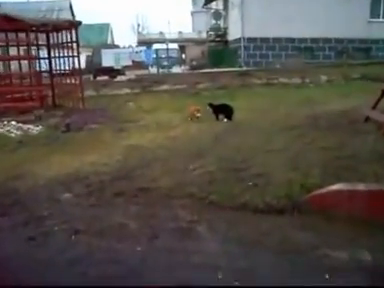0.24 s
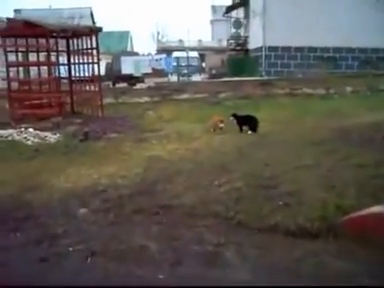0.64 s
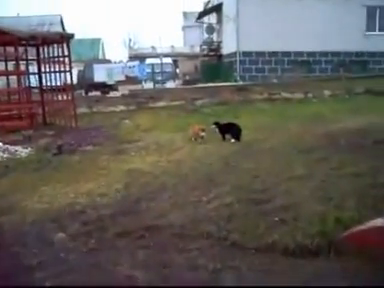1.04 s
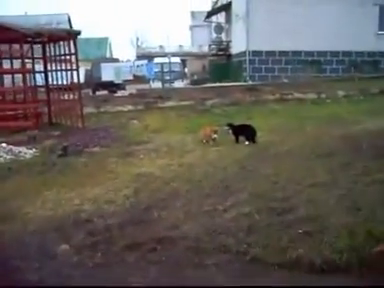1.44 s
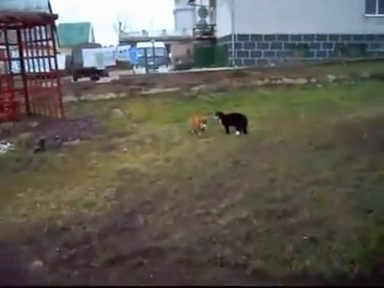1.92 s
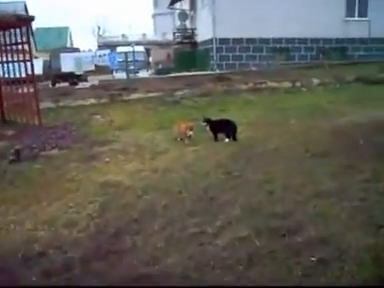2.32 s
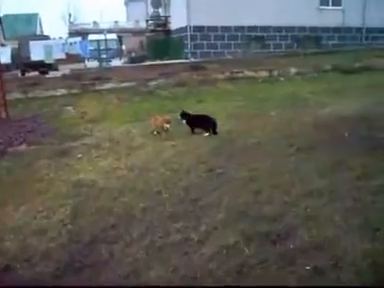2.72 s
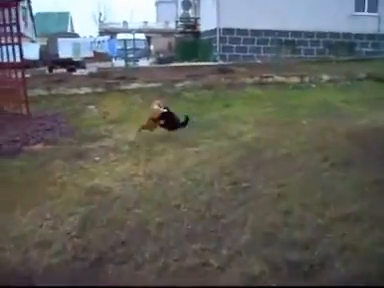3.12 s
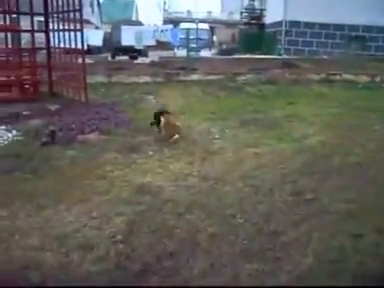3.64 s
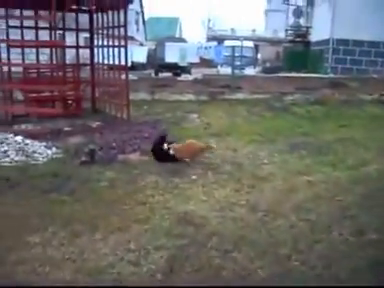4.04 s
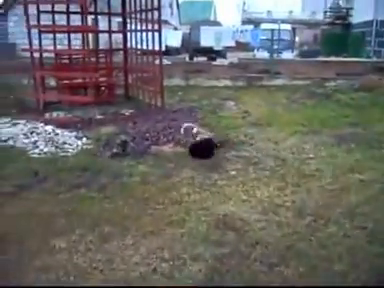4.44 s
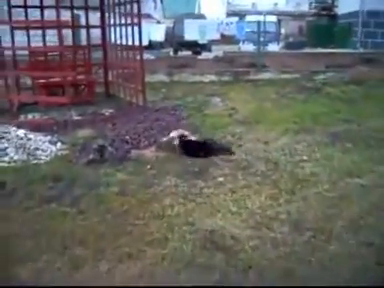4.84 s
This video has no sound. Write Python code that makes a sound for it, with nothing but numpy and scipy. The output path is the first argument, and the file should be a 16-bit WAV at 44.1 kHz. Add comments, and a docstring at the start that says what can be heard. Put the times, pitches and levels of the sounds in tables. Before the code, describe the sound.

A cat's long wavering yowl and another's low moan climb into a rasping shriek and screeching clash, then snarls, thin whines and muffled growls outdoors.

```python
"""On a lawn between house walls two cats face off: one holds a long yowl, the other answers with a low moan.
A rising shriek breaks into a screech as they clash, then come snarls, a thin whine and muffled growls.
Calls are sums of harmonics shaped by the mouth; harsh voices mix irregular fold pulses with puffs of noise.
Paws thud as resonant noise and dry grass snaps as short noise bursts; wall echoes, a scattered tail and
a faint outdoor hush of coloured noise surround them."""
import sys
import numpy as np
from scipy import signal
from scipy.fft import rfft, irfft, next_fast_len
from scipy.io import wavfile
from scipy.ndimage import uniform_filter1d

SR = 44100
rng = np.random.default_rng(int(sys.argv[2]) if len(sys.argv) > 2 else 0)


def materialize(psi):
    """Save the field psi as 16-bit PCM at rate SR to the path in sys.argv[1].

    A 1-D psi becomes a single channel; in a 2-D psi each row is a channel.
    """
    bounded = np.clip(np.atleast_2d(psi).T, -1, 1)
    quanta = np.round(bounded * 32767).astype(np.int16)
    wavfile.write(sys.argv[1], SR, quanta)


N = 224086
TIME = np.arange(N) / SR

# Pitch of the long yowl. Each row: time in seconds, pitch in Hz.
YOWL_PITCH = [(0.0, 469.7), (0.06, 463.1), (0.37, 488.8), (0.41, 507.3), (0.92, 457.8), (0.99, 472.3),
              (1.08, 528), (1.1, 603), (1.16, 691), (1.23, 726), (1.32, 698.7), (1.49, 524.6),
              (1.54, 498.5), (1.7, 514.6), (1.76, 496), (1.93, 496.4), (2.03, 454), (2.11, 377)]
# Partings of the lips in the yowl. Each row: parting in seconds, start of closing in seconds,
# closing time in seconds.
LIP_PARTINGS = [(0.202, 0.582, 0.21), (0.868, 2.013, 0.11)]
# Lowest mouth resonance, which follows the jaw. Each row: time in seconds, resonance in Hz.
JAW_RESONANCE = [(.2, 1770), (.48, 2050), (.6, 1510), (.97, 1440), (1.22, 2200), (1.44, 2244), (1.65, 1910)]
# Mouth colours of the yowl, narrow and wide. Each row: frequency in Hz, relative level in dB.
MOUTH_NARROW = [(480, -18.5), (960, -14.5), (1150, -18), (1450, -9), (2000, -9.5), (2450, 0.5),
                (2950, -1.5), (3400, -19), (3900, -22.5), (4400, -24.5), (5000, -19.5), (5500, -14),
                (6100, -25), (7200, -26), (9500, -44.5)]
MOUTH_WIDE = [(700, -14), (1350, -30.5), (1800, -17.5), (2200, -9), (2850, -12), (3550, -5.5), (4300, 0.5),
              (5000, -12), (5700, -9), (6400, -17), (7200, -12.5), (8500, -22), (10000, -51)]
# Air hissing through the parted lips. Each row: frequency in Hz, relative level in dB.
LIP_HISS = [(800, -18.5), (2400, -13), (4000, 9), (5500, 7.5), (7500, 9.5), (10000, -35.5)]
PART_S, LIPS_SHUT_DB = 0.061, -12.5
# Loudness and shrillness follow the pitch, trailing it a little; the levels apply at REST_HZ.
REST_HZ, JAW_LAG_S = 492.2, 0.022
THROAT_DB, THROAT_DB_PER_OCT, THROAT_MAX_DB = -31, 30, -22
SHRILL_DB, SHRILL_DB_PER_OCT = -48.5, 43.5

# Snapping grass. Each row: time in seconds, relative level in dB.
GRASS_SNAPS = [(0.204, -25.5), (0.5413, -30), (3.798, -40), (3.987, -43.5), (4.45, -34), (4.464, -36.5),
               (4.486, -43), (4.5665, -47), (4.9188, -23), (4.925, -17)]
# Dull paw thuds. Each row: time in seconds, relative level in dB, resonance in Hz.
PAW_THUDS = [(1.111, -40.5, 201), (1.893, -36, 219.3), (3.026, -31, 75), (3.986, -35, 284)]
# Colour of the grass blades. Each row: frequency in Hz, relative level in dB.
GRASS_COLOUR = [(100, -44), (300, -19), (2200, -18), (3500, -2.0), (4700, -3.0), (7000, -7),
                (9000, -27.0), (11000, -69.5)]
# Colour of the outdoor hush. Each row: frequency in Hz, relative level in dB.
HUSH_COLOUR = [(12, -29.5), (20, 0.5), (401, -13.5), (446, -10), (538, -8.5), (895, -7.5), (1200, -13.5),
               (2280, -16), (2980, -22), (8030, -25), (10200, -54), (12000, -84), (15600, -104),
               (22000, -120)]
HUSH_DB = -51.5

# Snarls and growls. Each row: start, widest mouth and end in seconds, open-mouth pitch in Hz,
# open-mouth resonance in Hz, its strength in dB, open-mouth chest, throat and edge
# (low, middle and high register) levels in dB, roughness from 0 to 1.
SNARLS = [(2.005, 2.06, 2.14, 390, 850, 12, -46.5, -54, -72, 0.4),
          (3.076, 3.139, 3.175, 462, 2100, -12, -38, -16.5, -26, .8),
          (3.164, 3.197, 3.27, 489.2, 1990, -2.5, -42.5, -11, -23, 0.65),
          (3.27, 3.339, 3.375, 412.2, 1490, 4.5, -37.5, -26, -41, 0.68),
          (3.381, 3.535, 3.595, 289.9, 2140, 12.5, -31.5, -29, -47.5, 0.77),
          (3.595, 3.696, 3.75, 240.1, 1390, 16, -34.5, -36.5, -65, 0.38),
          (4.855, 4.88, 4.91, 236.5, 700, -4, -40, -60, -77, 0.65),
          (4.916, 4.96, 5.07, 237.7, 790, -8, -30, -43.5, -60, 0.8),
          (5.009, 5.081, 5.1, 301.8, 1900, -6, -37.5, -34, -46, 0.69)]
# Colour of the snarls. Each row: frequency in Hz, relative level in dB.
SNARL_COLOUR = [(70, -46), (170, 1), (230, -6.5), (450, 10.5), (700, 0.5), (900, 6), (1300, 8.5),
                (2300, 10), (3000, 1), (4000, -2.5), (5200, 5), (6800, -2.5), (8500, -10.5), (11000, -64)]
SNARL_ATTACK_S, SNARL_RELEASE_S = 0.0065, 0.044
# As the mouth shuts its resonance moves to SHUT_HZ, the pitch sags and the upper registers dim.
SHUT_HZ, SHUT_PITCH_SAG, SHUT_THROAT_DB, SHUT_EDGE_DB = 965, .12, -11, -12.5

# The soft moan. Each row: time in seconds, pitch in Hz, relative level in dB.
MOAN_COURSE = [(2.09, 369, -39), (2.136, 326.5, -49.5), (2.25, 427.6, -35.5), (2.34, 478.6, -40),
               (2.404, 426.4, -44.5), (2.47, 403, -47.5), (2.56, 440, -42)]
# Closed-mouth colour of the moan. Each row: frequency in Hz, relative level in dB.
MOUTH_SHUT = [(400, -13), (750, 0), (1000, 0), (1250, -5), (1450, -20), (1750, -22), (2200, -9),
              (2600, -13), (3300, -40)]

# The shriek. Each row: time in seconds, rate of the doubled fold period in Hz.
SHRIEK_RATE = [(2.49, 204.6), (2.534, 277.1), (2.598, 320.8), (2.68, 364.2), (2.733, 426.7), (2.739, 458.8),
               (2.8, 491), (2.895, 532.2), (2.965, 608.6), (3.01, 630)]
# Its strength. Each row: time in seconds, relative throat level in dB, relative edge level in dB.
SHRIEK_LEVEL = [(2.49, -45, -62), (2.52, -29.5, -41), (2.552, -26.5, -28), (2.616, -25, -17),
                (2.776, -14, -12.5), (2.83, -11.5, -16), (2.944, -19, -10.5), (3.01, -15, -19)]
# Mouth colour of the shriek. Each row: frequency in Hz, relative level in dB.
MOUTH_SHRIEK = [(550, -24), (1000, -30), (1500, -30), (1950, -14), (2450, 0), (2950, -19), (3400, -25),
                (4000, -6), (4750, 0), (5400, -13), (5900, -28), (6700, -16), (7700, -30), (9500, -44)]
DOUBLING_S, DOUBLING_TAKES_S = 2.615, 0.02  # the folds slip into period doubling

# Colour of the harsh open-mouthed clash. Each row: frequency in Hz, relative level in dB.
SCREAM_COLOUR = [(180, -51), (300, -13), (427, -23.5), (629, -19), (750, -5.5), (1120, -28), (1250, -12),
                 (1430, -15.5), (2310, -7.5), (2850, -10), (4260, -15), (5330, -16.5), (7240, -16.5),
                 (10300, -42), (14000, -80)]
SCREAM_START_S, SCREAM_PEAK_S, SCREAM_END_S = 2.78, 3.007, 3.135
# Shrill tones in the clash and in the last cry. Each row: start in seconds, length in seconds,
# first pitch in Hz, last pitch in Hz, relative level in dB.
SCREECHES = [(2.964, 0.092, 2079, 2315, -14.5), (3.008, 0.047, 4150, 4400, -15.5),
             (3.04, 0.0365, 2487, 2174, -8.5), (3.048, 0.042, 4030, 3860, -15.5),
             (5.029, 0.036, 4600, 4670, -45)]

# Air around the whines. Each row: frequency in Hz, relative level in dB.
WHINE_AIR_COLOUR = [(400, 2), (900, 9.5), (1300, -2), (1900, -5), (2350, 4), (2900, -25), (5000, -47)]
# Thin whines. Each row: start in seconds, length in seconds, mid-call pitch in Hz, relative level in dB.
WHINES = [(3.89, .63, 779.5, -43), (4.57, .36, 773, -44.5)]
# Colour of the whine through the nose. Each row: frequency in Hz, relative level in dB.
NOSE = [(780, 8), (1550, -15), (2300, -10.5), (3200, -20)]
WHINE_SAG_HZ_PER_S = 110
# Muffled grunts. Each row: centre in seconds, relative level in dB, length in seconds.
GRUNTS = [(4.405, -42.5, 0.14), (4.46, -48, 0.051), (4.503, -38.5, 0.055), (4.59, -39.5, .075),
          (4.648, -50, 0.044)]

# Decay of the scattered tail. Each row: frequency in Hz, time to fall 60 dB in seconds.
YARD_DECAY = [(200, 0.38), (2000, 0.063), (5000, 0.34), (9000, 0.054)]
# Wall echoes. Each row: delay in seconds, level in dB.
WALL_ECHOES = [(0.015, -16.5), (0.044, -18.5)]
# Broad noise whose strength follows the loudness. Each row: frequency in Hz, relative level in dB.
NOISE_COLOUR = [(25, 5), (80, 6.5), (180, 6.5), (400, 6), (2500, 2.5), (5000, -23), (8000, 1),
                (10000, -27.5), (14000, -45.5)]
EDGE_HZ = 14400  # upper band limit


def amp(db):
    """Level law: decibels become an amplitude ratio."""
    return 10 ** (np.asarray(db) / 20)


def unit(x):
    """Power normalisation: scales a signal to rms 1."""
    return x / np.sqrt(np.mean(x ** 2) + 1e-20)


def read(points, hz):
    """Spectral interpolation: reads a spectrum on a log-frequency axis."""
    f, value = np.transpose(points)
    return np.interp(np.log(hz + 1), np.log(f + 1), value)


def play(rows):
    """Linear interpolation: sample times of a curve table, and each column at those times."""
    s, *columns = np.transpose(rows)
    t = np.arange(s[0], s[-1], 1 / SR)
    return [t] + [np.interp(t, s, column) for column in columns]


def add(mix, s, sound):
    """Superposition: sums a sound into the mix at time s."""
    part = mix[max(round(s * SR), 0):][:len(sound)]
    part += sound[:len(part)]


def fade(t):
    """Amplitude envelope: an 11 ms linear start and end of a call."""
    return np.clip(np.minimum(t - t[0], t[-1] - t) / .011, 0, 1)


def gate(t, start, end, attack, release):
    """Amplitude envelope: attack, hold and release, from 0 to 1 and back."""
    return np.clip(np.minimum((t - start) / attack, (end - t) / release), 0, 1)


def colour(x, points):
    """Linear filtering: multiplies the Fourier spectrum by a colour, then scales to rms 1."""
    size = next_fast_len(len(x) + 512)
    gain = amp(read(points, np.fft.rfftfreq(size, 1 / SR)))
    return unit(irfft(rfft(x, size) * gain, size)[:len(x)])


def wobble(t, hz):
    """Band-limited random modulation: low-passed noise of rms 1, up to about hz."""
    f = np.fft.rfftfreq(65536, 1 / SR)
    slow = irfft(rfft(rng.standard_normal(65536)) / (1 + (f / hz) ** 4))
    return unit(np.resize(slow, len(t)))


def resonate(x, hz, width):
    """Resonance: a gain-1 peak follows hz by shifting it to zero frequency for a one-pole low-pass."""
    turn = np.exp(2j * np.pi * np.cumsum(hz * np.ones(len(x))) / SR)
    r = np.exp(-np.pi * width / SR)
    return 2 * (turn * signal.lfilter([1 - r], [1, -r], x / turn + 1e-18)).real


def registers(x, splits, levels):
    """Band splitting: each register, low to high, is levelled by its running power and set in dB."""
    size = next_fast_len(len(x) + 2048)
    f, rest, out = np.fft.rfftfreq(size, 1 / SR), rfft(x, size), 0
    for hz, db in zip(list(splits) + [SR], levels):
        low = rest / (1 + (f / hz) ** 20)
        rest = rest - low
        part = irfft(low, size)[:len(x)]
        power = uniform_filter1d(uniform_filter1d(part ** 2, size=900), size=900)
        out = out + amp(db) * part / np.sqrt(abs(power) + 1e-12)
    return out


def folds(t, hz, shape, jitter, flutter, count=26):
    """Harmonic series of vibrating folds: pitch jitters, partials flutter, shape(f) gives their dB."""
    phase = 2 * np.pi * np.cumsum(hz * (1 + jitter * wobble(t, 230))) / SR
    lag = rng.uniform(0, np.pi, count + 1)  # random phase per partial softens each pulse
    voice = 0
    for k in range(1, count + 1):
        level = amp(shape(k * hz)) * (k * hz < 9800)
        voice = voice + level * (1 + flutter * wobble(t, 32)) * np.cos(k * phase + lag[k])
    return voice


def rasp(t, hz, jitter, rough):
    """Irregular vibration: fold pulses with fluctuating partials, and a puff of noise in each cycle."""
    turns = np.cumsum(hz * (1 + jitter * wobble(t, 123.3))) / SR
    pulses = sum((1 + .5 * wobble(t, 71)) * np.cos(2 * np.pi * k * turns) for k in range(1, 17))
    puffs = (0.079 + np.exp(-(turns % 1) / .5)) * rng.standard_normal(len(t))
    rough = np.clip(rough, 0, 1)
    return ((1 - rough) * unit(pulses) + rough * unit(puffs)) * (1 + 0.13 * wobble(t, 57))


def yowl(jitter=0.0047, breath_db=-21, chest_db=-46, jaw_db=10, jaw_width_hz=220, muffle_db=-18,
         hiss_db=-6, quaver=.0065, dip_db=-7, dip_hz=4000):
    """Source and filter: a breathy voice whose mouth opens wider and quavers as the pitch climbs."""
    t, hz = play(YOWL_PITCH)
    trailing_hz = np.interp(t - JAW_LAG_S, t, hz)
    opening = np.clip((trailing_hz - REST_HZ) / 150, 0, 1)
    jaw_hz = np.interp(t, *np.transpose(JAW_RESONANCE))
    shut = 1 - sum(gate(t, start, end + closing, PART_S, closing) for start, end, closing in LIP_PARTINGS)

    octaves = np.log2(trailing_hz / REST_HZ)
    throat = np.minimum(THROAT_DB + THROAT_DB_PER_OCT * octaves, THROAT_MAX_DB) + LIPS_SHUT_DB * shut
    edge = SHRILL_DB + SHRILL_DB_PER_OCT * octaves

    def shape(f):
        """Vocal-tract filter in dB: narrow to wide, with the jaw resonance and the muffling of the lips."""
        narrow = read(MOUTH_NARROW, f) + dip_db * np.exp(-((f - dip_hz) / 500) ** 2)
        mouth = (1 - opening) * narrow + opening * read(MOUTH_WIDE, f)
        lips = muffle_db * shut * np.exp(-((f - 3000) / 400) ** 2)
        return mouth + lips + jaw_db / (1 + ((f - jaw_hz) / jaw_width_hz) ** 2)

    quavering_hz = hz * (1 + quaver * opening * wobble(t, 25))
    source = folds(t, quavering_hz, shape, jitter * (1 + opening), flutter=.17)
    voice = registers(source, (1150, 3400), (chest_db, throat, edge))
    breath = amp(throat + breath_db) * opening * colour(rng.standard_normal(len(t)), MOUTH_WIDE)
    hiss = amp(SHRILL_DB + hiss_db) * (1 - shut) * colour(rng.standard_normal(len(t)), LIP_HISS)
    return t[0], (voice + breath + hiss) * fade(t)


def grass_snaps(snap_db=-2):
    """Impulsive fracture: each snap is a noise burst with a fast and a weak slow decay."""
    snaps, t = np.zeros(N), np.arange(3000) / SR
    for s, db in GRASS_SNAPS:
        decay = np.exp(-t / .0011) + .07 * np.exp(-t / .014)
        add(snaps, s, amp(db + snap_db) * rng.standard_normal(len(t)) * decay)
    return snaps.std() * colour(snaps, GRASS_COLOUR)


def grass_rustle(rustle_db=-60, per_s=90):
    """Poisson-like crackle: random clicks decay as noise; the rustle gains strength after 3.2 s."""
    strengths = amp(4.5 * np.minimum(rng.exponential(1, N), 3))
    clicks = (rng.random(N) < per_s / SR) * strengths
    decay = signal.lfilter([1], [1, -np.exp(-1 / (0.0063 * SR))], clicks)
    crackle = decay * rng.standard_normal(N)
    return amp(rustle_db) * colour(crackle, GRASS_COLOUR) * np.interp(TIME, [3.2, 3.5], [.3, 1])


def paw_thuds():
    """Damped resonance: noise through two equal resonances rises and dies within milliseconds."""
    thuds, t = np.zeros(N), np.arange(3000) / SR
    for s, db, hz in PAW_THUDS:
        body = unit(resonate(resonate(rng.standard_normal(len(t)), hz, 300), hz, 300))
        add(thuds, s, amp(db) * body * t / 0.0049 * np.exp(1 - t / 0.004))
    return thuds


def outdoor_hush():
    """Stationary noise: a faint steady background with a falling spectrum."""
    return amp(HUSH_DB) * colour(rng.standard_normal(N), HUSH_COLOUR)


def snarl(start, widest, end, pitch_hz, open_hz, mouth_db, chest_db, throat_db, edge_db, rough,
          jitter=0.055, width_hz=600, shut_chest_db=-4):
    """Moving resonance: a rough voice in a mouth that opens and shuts once, dying behind shut lips."""
    t, shut = play([(start, 1), (widest, 0), (end, 1), (end + SNARL_RELEASE_S, 1)])
    drive = rasp(t, pitch_hz * (1 - SHUT_PITCH_SAG * shut), jitter * rough, rough)
    mouth_hz = open_hz * (SHUT_HZ / open_hz) ** shut
    ringing = resonate(resonate(drive, mouth_hz, width_hz), mouth_hz, width_hz)
    voice = colour(drive + amp(mouth_db) * ringing, SNARL_COLOUR)
    chest = chest_db + shut_chest_db * shut
    throat = throat_db + SHUT_THROAT_DB * shut
    edge = edge_db + SHUT_EDGE_DB * shut
    envelope = gate(t, start, t[-1], SNARL_ATTACK_S, SNARL_RELEASE_S)
    return start, registers(voice, (850, 3400), (chest, throat, edge)) * envelope


def moan(jitter=0.0068, gain_db=-1, shut_db=-18, open_db=6):
    """Changing filter: the low moan's overtones come out as the mouth starts to open."""
    t, hz, db = play(MOAN_COURSE)
    bright_db = np.interp(t, [2.3, 2.45], [shut_db, open_db])

    def shape(f):
        """Vocal-tract filter in dB: the shut mouth, with brightness varied above 1 kHz."""
        return read(MOUTH_SHUT, f) + bright_db * np.clip((f - 1000) / 200, 0, 1)

    return t[0], amp(db + gain_db) * unit(folds(t, hz, shape, jitter, flutter=0.2, count=7)) * fade(t)


def shriek(jitter=0.0048, chest_db=-26, single_db=-26, doubled_db=2, throat_db=-.5, edge_db=-1):
    """Period doubling: odd partials emerge as the cry roughens and drawn-back lips raise resonances."""
    t, hz = play(SHRIEK_RATE)
    s, *levels = np.transpose(SHRIEK_LEVEL)
    throat, edge = (np.interp(t, s, db) for db in levels)
    strain = np.interp(t, [2.81, 2.86, 3.0], [1, 2.1, 2.8])
    spread = np.interp(t, [2.5, 2.7, 2.9, 2.97], [.93, 1, 1, 1.08])
    odd_db = np.interp(t - DOUBLING_S, [0, DOUBLING_TAKES_S], [single_db, doubled_db])

    def shape(f):
        """Vocal-tract filter in dB: shifted mouth resonances, with the odd partials set apart."""
        return read(MOUTH_SHRIEK, f / spread) + odd_db * (np.round(f / hz) % 2)

    voice = folds(t, hz, shape, jitter * strain, flutter=.3, count=32)
    levels = throat + chest_db, throat + throat_db, edge + edge_db
    return t[0], registers(voice, (1150, 3400), levels) * fade(t)


def scream(throat_db=-18.0, edge_db=-15, rise_db_per_s=50, throat_fall_db_per_s=55, edge_fall_db_per_s=140):
    """Chaotic folds as the cats collide: a swell, then a fall in which the edge dies first."""
    t = np.arange(SCREAM_START_S, SCREAM_END_S, 1 / SR)
    swell = rise_db_per_s * np.minimum(t - SCREAM_PEAK_S, 0)
    past = np.maximum(t - SCREAM_PEAK_S, 0)
    throat = throat_db + swell - throat_fall_db_per_s * past
    edge = edge_db + swell - edge_fall_db_per_s * past
    pitch_hz = np.interp(t, [2.82, 2.98, 3.13], [520, 600, 500])
    drive = rasp(t, pitch_hz, jitter=.022, rough=.45)
    return t[0], registers(colour(drive, SCREAM_COLOUR), (3400,), (throat, edge)) * fade(t)


def screech(start, length, first_hz, last_hz, db, jitter=0.029):
    """Frequency modulation: one short, shrill, unsteady tone."""
    t, hz = play([(start, first_hz), (start + length, last_hz)])
    phase = 2 * np.pi * np.cumsum(hz * (1 + jitter * wobble(t, 260))) / SR
    return start, amp(db) * unit(np.sin(phase) * (1 + 0.15 * wobble(t, 200))) * fade(t)


def whine_air(start=3.5, end=4.9, air_db=-50):
    """Turbulence noise: an airy hiss around the whines."""
    t = np.arange(start, end, 1 / SR)
    return start, amp(air_db) * colour(rng.standard_normal(len(t)), WHINE_AIR_COLOUR) * fade(t)


def whine(start, length, pitch_hz, db, jitter=0.0083):
    """Few harmonics through a shut mouth: a thin voice swells and fades while the pitch sags."""
    t = np.arange(0, length, 1 / SR)
    hz = pitch_hz - WHINE_SAG_HZ_PER_S * (t - length / 2)
    voice = unit(folds(t, hz, lambda f: read(NOSE, f), jitter, flutter=0.2, count=4))
    return start, amp(db) * voice * np.sin(np.pi * t / length)


def grunt(s, db, length):
    """Low resonances in series: a short growl muffled in fur."""
    t = np.arange(0, length, 1 / SR)
    drive = rasp(t, 230 + 0 * t, jitter=0.124, rough=0.46)
    voice = resonate(resonate(drive, 390, 160), 425, 240)
    return s - length / 2, amp(db) * unit(voice) * np.sin(np.pi * t / length)


def yard(x, tail_db=-19):
    """Reflection and scattering: convolution adds two wall echoes and a thin decaying tail."""
    taps = rng.standard_normal(SR // 2) * (rng.random(SR // 2) < 2000 / SR)
    taps[:500] = 0  # no scattering arrives at once
    hz, t, z = signal.stft(taps, SR, nperseg=256)
    decay = amp(-60 * t / read(YARD_DECAY, hz)[:, None])
    tail = signal.istft(z * decay, SR, nperseg=256)[1]
    tail *= amp(tail_db) / np.linalg.norm(tail)
    for delay, db in WALL_ECHOES:
        add(tail, delay, amp([db]))
    return x + signal.fftconvolve(x, tail)[:N]


def scene():
    """Superposition: the cats and the scuffle sound in the yard, over the outdoor hush."""
    cats = np.zeros(N)
    for call in yowl(), moan(), shriek(), scream(), whine_air():
        add(cats, *call)
    for voice, rows in (snarl, SNARLS), (screech, SCREECHES), (whine, WHINES), (grunt, GRUNTS):
        for row in rows:
            add(cats, *voice(*row))
    scuffle = grass_snaps() + paw_thuds() + grass_rustle()
    return (yard(cats + scuffle) + outdoor_hush())[None]


def record(dry, noise_db=-22):
    """Level-following noise, saturation and low-pass: broad noise follows loudness; peaks are rounded."""
    loudness = np.sqrt(abs(uniform_filter1d(dry[0] ** 2, size=1200)))
    x = dry + amp(noise_db) * loudness * colour(rng.standard_normal(N), NOISE_COLOUR)
    x = x / (1 + (x / .8) ** 8) ** (1 / 8)  # peaks stay below 0.8
    band_limit = signal.firwin(511, EDGE_HZ, window=("kaiser", 9), fs=SR)
    return signal.oaconvolve(x, band_limit[None], "same")


dry = scene()
out = record(dry)
materialize(out)
```